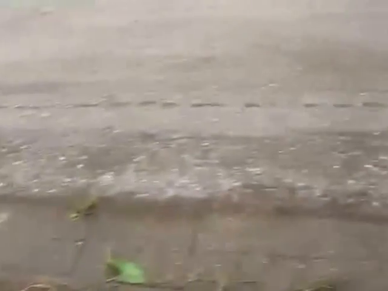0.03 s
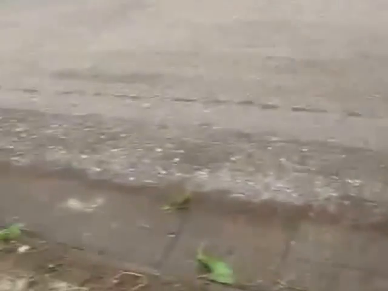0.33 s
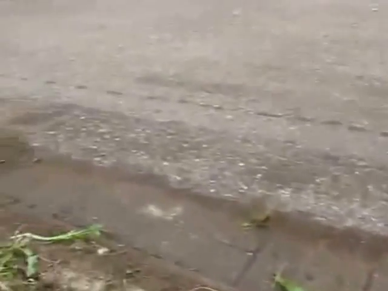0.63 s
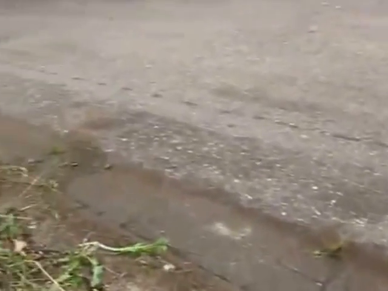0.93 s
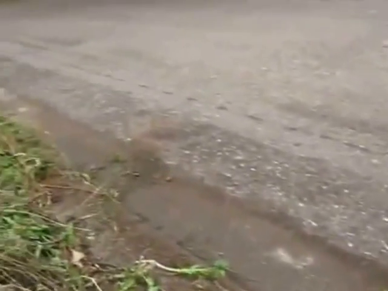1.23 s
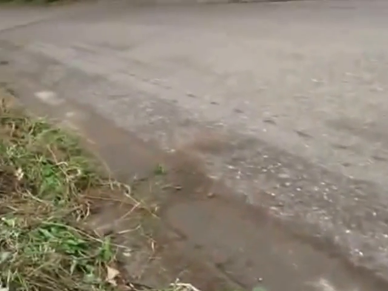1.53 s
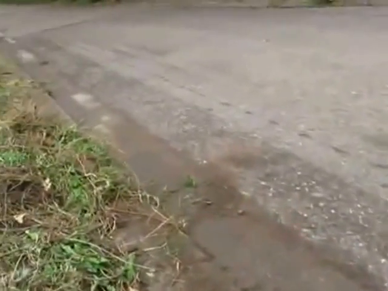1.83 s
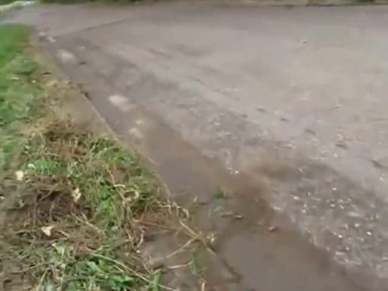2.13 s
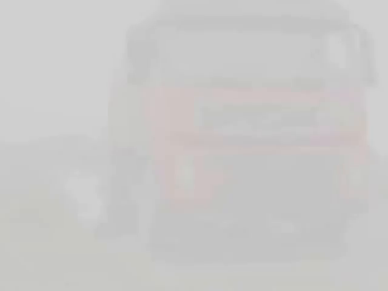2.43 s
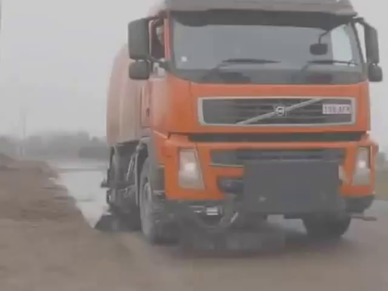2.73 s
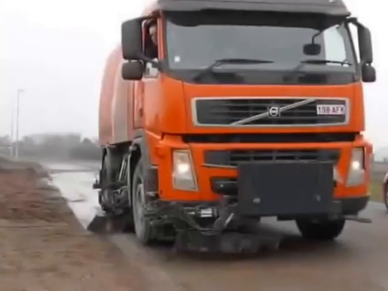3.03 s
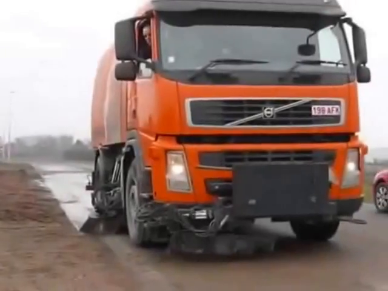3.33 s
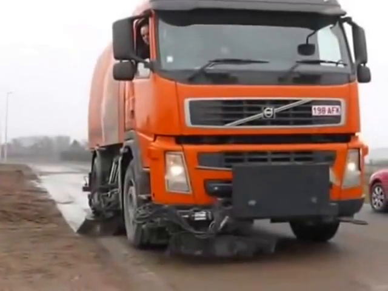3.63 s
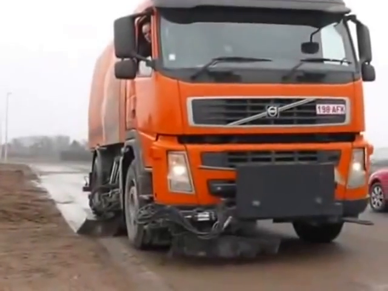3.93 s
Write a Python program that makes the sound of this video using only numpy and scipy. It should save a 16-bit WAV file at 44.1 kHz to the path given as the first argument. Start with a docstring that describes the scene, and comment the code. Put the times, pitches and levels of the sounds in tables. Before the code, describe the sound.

A street sweeper truck works outdoors, its suction fan roaring beside the microphone while grit rattles and bristles scrape. After a sudden cut, its diesel throb and the hiss of wet brushes grow steadily louder, heard from the front.

```python
"""Street sweeper at the roadside

Microphone at the kerb, close beside the truck: the suction fan drones, air roars in hopper and duct,
grit rattles, bristles hiss and a thin whistle sits on top. This cuts off, and the truck fades in
from the front: two diesel engines throb under the hiss of brushes on the wet road."""
import sys
import numpy as np
from scipy import signal
from scipy.fft import rfft, irfft
from scipy.io import wavfile
from scipy.ndimage import uniform_filter1d, minimum_filter1d

SR = 44100
rng = np.random.default_rng(int(sys.argv[2]) if len(sys.argv) > 2 else 0)


def unload_wav(signal):
    """Save mono or channel-first audio to the path in sys.argv[1] as 16-bit WAV at rate SR, clipped to [-1, 1]."""
    wavfile.write(
        sys.argv[1],
        SR,
        np.round(np.clip(np.atleast_2d(signal).T, -1, 1) * 32767).astype(np.int16),
    )


N = 176400
T = np.arange(N) / SR
FREQS = np.maximum(np.arange(N // 2 + 1) * SR / N, 1)
CUT_S = 2.237  # the kerb position ends here


def undb(db):
    return 10 ** (np.asarray(db) / 20)


def unit(x):
    return x / np.sqrt(np.mean(x ** 2))


def noise():
    return rng.standard_normal(N)


def lowpass(x, hz):
    return signal.sosfilt(signal.ellip(10, .2, 80, hz, fs=SR, output="sos"), x)


def walk(rate):
    """Smooth random drift of rms 1, moving up to about rate times a second."""
    slow = np.exp(-(FREQS / rate) ** 2)
    slow[0] = 0
    return unit(irfft(rfft(noise()) * slow, N))


def curve(points):
    """Gain over time from (t/s, level/dB) points."""
    return undb(np.interp(T, *np.array(points).T))


def colour(x, points):
    """Shape a spectrum by (f/Hz, level/dB) points; rms 1."""
    hz, db = np.array(points).T
    gain = undb(np.interp(np.log(FREQS), np.log(hz), db))
    return unit(irfft(rfft(x) * gain, N))


def grains(per_s, spread_db):
    """Random tiny impacts, a few much stronger than the rest."""
    hits = (rng.random(N) < per_s / SR) * noise()
    return hits * undb(spread_db * np.minimum(rng.exponential(size=N), 3))


def ring(hz, width):
    """Turbulence ringing one steep-sided resonance; rms 1."""
    detuning = (FREQS / hz - hz / FREQS) * hz / (np.pi / 2 * width)
    return unit(irfft(rfft(noise()) / (1 + 1j * detuning) ** 2, N))


def resonances(table):
    """Each resonance grows or fades steadily as the truck moves."""
    from_midway_s = np.minimum(T, CUT_S) - CUT_S / 2
    return sum(ring(hz, width) * undb(db + growth * from_midway_s) for hz, width, db, growth in table)


def turning(hz, wander, rate):
    """Phase of a shaft whose speed wanders by a small fraction."""
    return 2 * np.pi * np.cumsum(hz * (1 + wander * walk(rate))) / SR


def tone(phase, db, flutter_db, rate):
    """One partial whose level flutters."""
    return np.sqrt(2) * np.sin(phase + 2 * np.pi * rng.random()) * undb(db + flutter_db * walk(rate))


def whines(table):
    """Faint, thin, wavering tones of the machinery."""
    return sum(tone(turning(hz, wander=0.00039, rate=9.8), db, flutter_db=3.5, rate=12)
               for hz, db in table)


def rumble():
    """Low rumble that swells as the truck nears the microphone."""
    # rumble ahead of the truck: t/s, level/dB
    levels = [(3.0, -54), (3.45, -44.5), (3.65, -49.5), (3.84, -36), (4.0, -47)]
    # f/Hz, relative level/dB
    spectrum = [(20, -36), (38, -14), (52, 3.5), (65, 1), (100, -7.5), (250, -41), (1000, -76.5)]
    return colour(noise(), spectrum) * curve(levels)


def whistle():
    """Air whistles in narrow high bands, with one thin tone among them."""
    # whistling air: f/Hz, width/Hz, level/dB, growth/(dB/s)
    bands = [(9220, 980, -51, 3.5), (10320, 150, -49, -1.5), (10570, 87, -54, 2), (10560, 60, -56, 3.5)]
    phase = turning(hz=10376, wander=0.00017, rate=25)
    return tone(phase, db=-51, flutter_db=3.5, rate=10) + resonances(bands)


def bristles():
    """Bristles scrape beside the kerb and recede."""
    # spectrum of the scraping: f/Hz, relative level/dB
    spectrum = [(1000, -14.5), (2500, -1), (4500, 0.5), (6000, -1), (8000, -2), (11000, -18)]
    # bristle hiss: t/s, level/dB
    levels = [(0, -44.5), (.42, -46.5), (.55, -50.5), (1.1, -50), (1.58, -51.5), (1.7, -56.5), (2.23, -53)]
    return colour(grains(per_s=9000, spread_db=2), spectrum) * curve(levels)


def grit(rattle_db=1.8):
    """Grit rattles up the duct in uneven flurries."""
    # spectrum of the impacts: f/Hz, relative level/dB
    spectrum = [(500, -26.5), (1200, -6), (1700, -2), (2200, -4.5), (2800, -12), (4200, -16.5),
                (6000, -24.5), (9000, -16.5), (11000, -26)]
    # grit in the duct: t/s, level/dB
    levels = [(0, -45), (.6, -48), (.75, -44), (1.2, -43.5), (1.38, -51), (1.57, -41.5), (1.75, -46),
              (2.0, -43.5), (2.23, -44)]
    flurries = curve(levels) * undb(rattle_db * walk(42))
    return flurries * colour(grains(per_s=3700, spread_db=3), spectrum)


def wet_brushes(db=-33.5, chatter_db=-0.1):
    """Brushes on the wet road: tiny impacts, dense enough to hiss."""
    # spectrum of the spray: f/Hz, relative level/dB
    spray = [(900, -14.5), (1350, 1), (1550, -9), (1700, 3.5), (1900, -16), (2050, 5.5), (2300, 6.5),
             (2900, 3), (4000, 3), (5200, 0.5), (6000, -21.5)]
    return undb(db + chatter_db * walk(35)) * colour(grains(per_s=14000, spread_db=1.5), spray)


def diesel(firing_hz, orders):
    """Slightly uneven engine orders; also gives the firing phase."""
    phase = turning(firing_hz, wander=0.0041, rate=9.6)
    return sum(tone(round(k) * phase, db, flutter_db=0.9, rate=12) for k, db in orders), phase


def engines(roar_db=-26.5, throb=0.14):
    """One diesel drives the truck, one the sweeping gear; a roar pulses as the second fires."""
    # driving engine: multiple of the firing rate, level/dB
    drive_orders = [(1, -51.5), (2, -41.5), (3, -45.5), (4, -32), (6, -38), (8, -50), (12, -48)]
    # sweeping gear's engine: multiple of the firing rate, level/dB
    gear_orders = [(1, -44.5), (2, -41), (3, -37), (4, -42.5), (6, -35), (8, -46.5), (12, -43)]
    # roar from the front: f/Hz, relative level/dB
    spectrum = [(20, -19.5), (50, -15.5), (90, -8), (130, -3.5), (165, 0), (220, 2), (280, -3), (420, -7.5),
                (600, -8.5), (720, -6), (970, -7), (1180, -20.5), (1900, -21.5), (4000, -40.5)]
    drive, _ = diesel(firing_hz=60.4, orders=drive_orders)
    gear, firing = diesel(firing_hz=57.1, orders=gear_orders)
    pulsing = noise() * (1 + throb * np.cos(firing))
    return drive + gear + undb(roar_db) * colour(pulsing, spectrum)


def suction(rush_db=-30.5):
    """Air rushes through hopper and duct and rings their resonances."""
    # hopper and duct resonances: f/Hz, width/Hz, level/dB, growth/(dB/s)
    duct = [(227.2, 35, -32.5, 1.5), (323.8, 33, -29, 1.5), (352.7, 62, -30.5, 1.5), (456, 45, -40, 8),
            (548, 34, -32, 0), (596.5, 54, -32.5, 2.5), (765.3, 75, -34.5, 2.5), (846, 62, -44, -1.5),
            (1017, 68, -47.5, 7), (1490, 320, -44, 4.5), (1833, 197, -47, 2), (2156, 300, -52, 5.5)]
    # rush of air: f/Hz, relative level/dB
    rush = [(20, -28.5), (38, -10.5), (52, -7.5), (90, -1), (190, 2), (270, -5.5), (450, -10), (850, -9),
            (1150, -21.5), (2500, -25.5), (3500, -30.5), (8000, -43.5)]
    # resonances that swell as the nozzle moves: t/s, half length/s, f/Hz, width/Hz, level/dB
    swells = [(.95, 0.32, 1840, 180, -46.5), (1.35, 0.28, 85, 32, -36), (1.6, .12, 563, 38, -29),
              (2.03, 0.14, 546, 14.7, -26)]
    air = resonances(duct) + undb(rush_db) * colour(noise(), rush)
    return air + sum(ring(hz, width) * undb(db) * np.exp(-((T - at) / half) ** 2)
                     for at, half, hz, width, db in swells)


def fan(blade_pass_hz=324.9):
    """Blade-pass drone of the suction fan; its overtones weaken toward the cut."""
    # fan tones: multiple of the blade-pass rate, level/dB, flutter/dB
    partials = [(1, -24.5, 1.5), (2, -28.5, 1), (3, -57.5, -1), (4, -57, 1.5), (5, -54.5, -3.5)]
    # rise and fall of the drone: t/s, fundamental gain/dB, overtone gain/dB
    gains = [(0, -1, -0.5), (0.129, 3.5, 0), (0.499, 0.5, 0), (0.999, -0.5, 0), (1.3, -1, 1.5),
             (1.5, -11, 1.5), (1.68, -3.5, -1.5), (1.83, 3, 1), (2.02, -13.5, -11.5), (2.21, 3.5, -12)]
    times, fundamental_db, overtone_db = np.array(gains).T
    phase = turning(blade_pass_hz, wander=0.0023, rate=6.8)
    drone = np.zeros(N)
    for k, db, flutter_db in partials:
        gain_db = np.interp(T, times, fundamental_db if round(k) == 1 else overtone_db)
        drone += tone(round(k) * phase, db + gain_db, flutter_db, rate=19)
    return drone


def from_kerb(surge_db=1.0, flicker_db=0.78, dip_at_s=1.635, dip_db=-5.5, recover_s=0.077):
    """Microphone beside the truck, up to the cut; the level dips briefly on the way."""
    # machinery whines at the side: f/Hz, level/dB
    side_whines = [(1518.6, -58), (9403, -66), (9507, -66.5), (10660, -64)]
    drone = fan()
    intake = (suction() + grit()) * undb(surge_db * walk(18))
    hiss = (bristles() + whistle()) * undb(flicker_db * walk(22))
    since_dip = np.maximum(T - dip_at_s, 0)
    dip = undb(dip_db * np.minimum(since_dip / 0.01, 1) * np.exp(-since_dip / recover_s))
    cut = np.clip((CUT_S - T) / 0.00099, 0, 1)
    return (drone + intake + hiss + whines(side_whines)) * dip * cut


def from_front(start_s=2.443, full_s=3.82):
    """Microphone ahead of the truck, fading in with the high treble cut."""
    # machinery whines at the front: f/Hz, level/dB
    front_whines = [(2277, -55), (2514, -58), (2987, -55.5)]
    truck = engines() + wet_brushes() + rumble() + whines(front_whines)
    fade = np.clip((T - start_s) / (full_s - start_s), 0, 1) ** 1.012
    return lowpass(truck, hz=5400) * fade


def scene():
    """The two microphone positions in turn, in mono."""
    return (from_kerb() + from_front())[None]


def record(dry, ceiling=.31):
    """A limiter holds down the strongest peaks, then the top is cut."""
    needed_gain = np.minimum(1, ceiling / (np.abs(dry) + 1e-9))
    held_gain = minimum_filter1d(needed_gain, size=441)  # 10 ms
    return lowpass(dry * uniform_filter1d(held_gain, size=441), hz=10720)


dry = scene()
out = record(dry)
unload_wav(out)
```